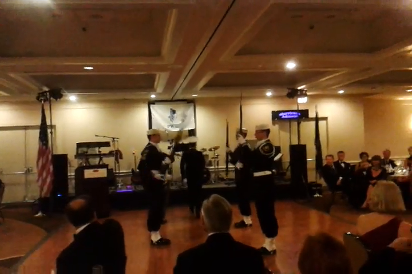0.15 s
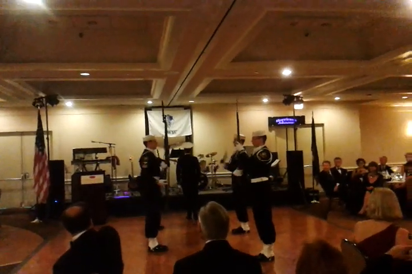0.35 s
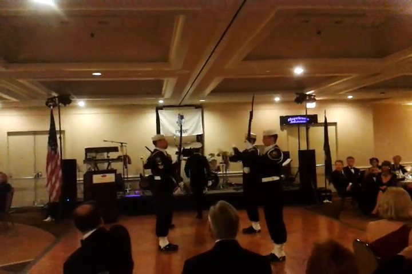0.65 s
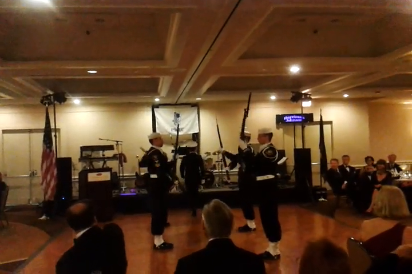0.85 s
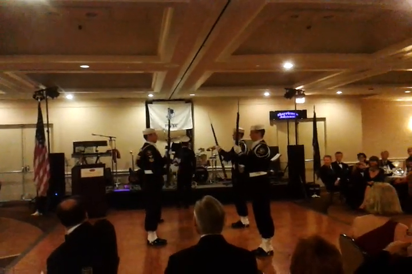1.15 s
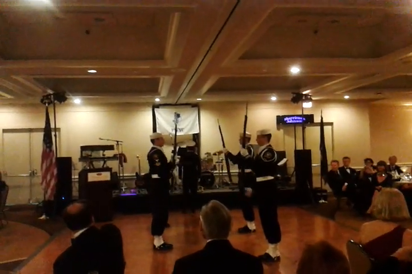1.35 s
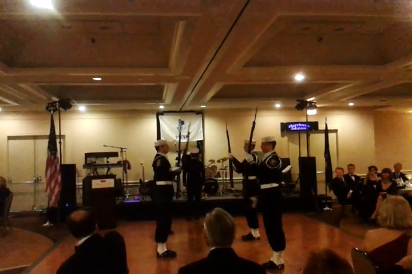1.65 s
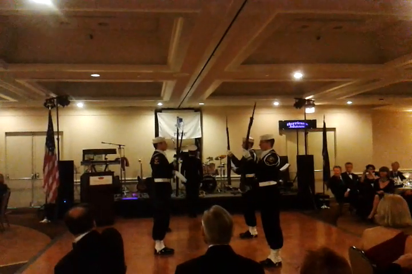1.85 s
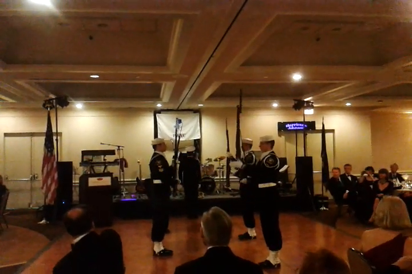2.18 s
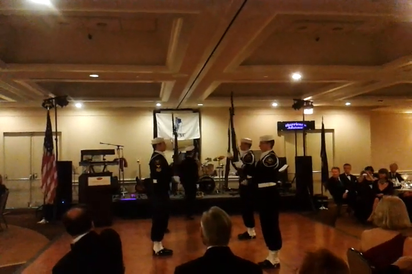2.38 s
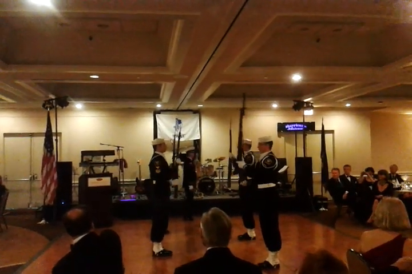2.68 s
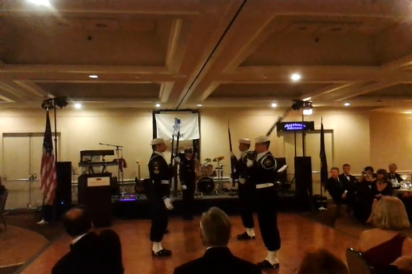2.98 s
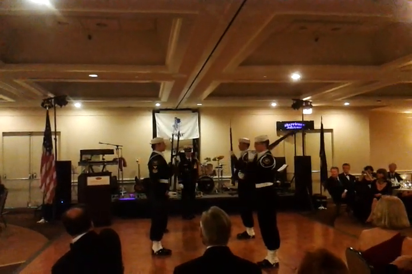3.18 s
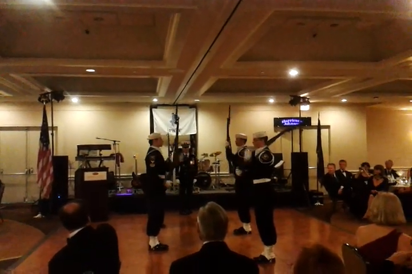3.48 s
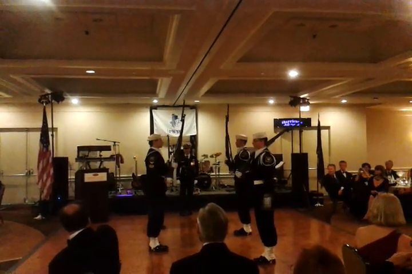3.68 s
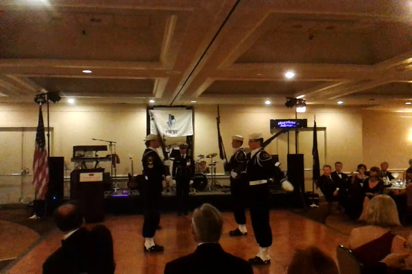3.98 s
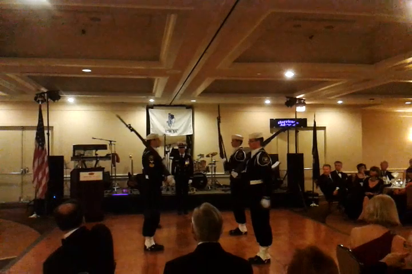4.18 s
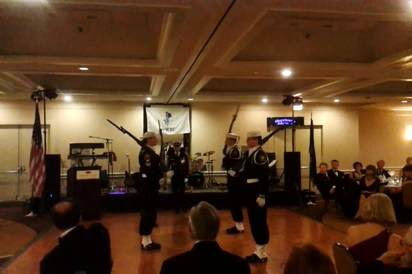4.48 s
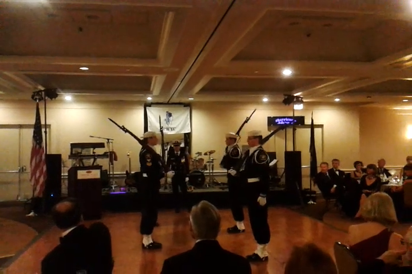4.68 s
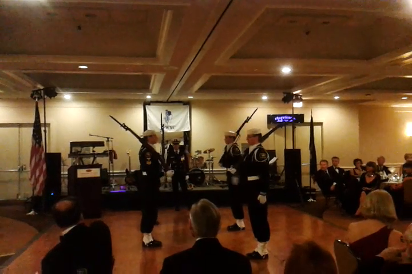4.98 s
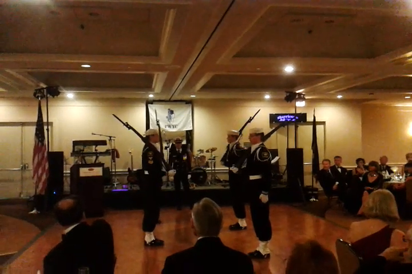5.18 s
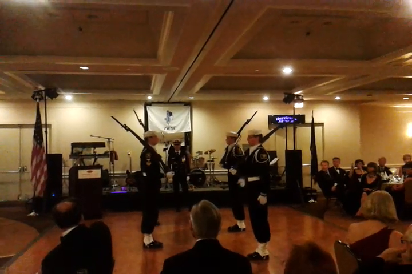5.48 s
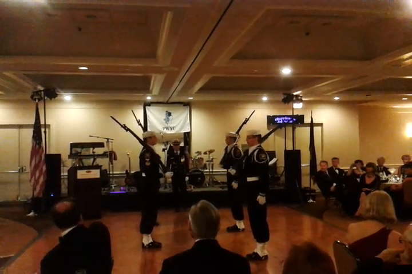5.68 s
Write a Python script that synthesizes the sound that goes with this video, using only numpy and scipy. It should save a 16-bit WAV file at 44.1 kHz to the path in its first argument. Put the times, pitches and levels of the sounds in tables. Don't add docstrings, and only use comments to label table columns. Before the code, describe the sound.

In a carpeted banquet hall, a boot stamps hard on a wooden dance floor with a heel crack and low boom. Loud rifle clacks follow, wood and loose steel together, then lighter catches, ticks and thuds thin out. A small distant camera hears short room echo and quiet ventilation hush.

```python
import sys
import numpy as np
from scipy import signal
from scipy.fft import rfft, irfft, next_fast_len
from scipy.io import wavfile
from scipy.ndimage import uniform_filter1d

SR = 44100
rng = np.random.default_rng(int(sys.argv[2]) if len(sys.argv) > 2 else 0)


def bounce(signal):
    frames = np.transpose(np.atleast_2d(signal))
    limited = np.clip(frames, -1, 1)
    pcm = np.round(limited * 32767).astype(np.int16)
    wavfile.write(sys.argv[1], SR, pcm)


def undo_db(level):
    steps = np.asarray(level, float) / 20
    return 10 ** steps


N = 257979


def evened(x):
    return x / np.sqrt(np.mean(x ** 2) + 1e-20)


def read(points, hz):
    f, value = np.transpose(points)
    return np.interp(np.log(hz + 1), np.log(f + 1), value)


def add(mix, s, sound):
    part = mix[round(s * SR):][:len(sound)]
    part += sound[:len(part)]


def blow(hz, looseness, tilt_db, body, ring_db, ring_width, luck, scatter_db):
    u = np.arange(2000) / SR / (0.015 * np.clip(looseness, .03, 1))
    envelope = u * np.exp(-u * (1 + u / 4))
    impacts = luck[:2000] * undo_db(scatter_db * luck[2000:]) * envelope
    f = abs(np.fft.fftfreq(4096, 1 / SR))
    octaves = np.log2((f + 20) / hz)
    mode_db = ring_db / (1 + (octaves / ring_width) ** 2)
    colour_db = read(body, f) + tilt_db * np.clip(octaves, -2, 2) + mode_db
    log_gain = np.log(undo_db(colour_db))
    phase = -signal.hilbert(log_gain).imag
    ring = np.fft.ifft(np.exp(log_gain + 1j * phase)).real[:3000]
    sound = signal.fftconvolve(impacts, ring)
    sound /= abs(sound).max()
    energy = (sound ** 2).sum()
    return sound, evened(ring) * np.sqrt(energy / len(ring))


# t/ms, level/dB
NEAR_ECHOES = [(3, -6.5), (8, -3.5), (14, -5.5), (26, -7), (37, -15.5), (51, -28)]
FIRM_DB = -30


def struck(events, body, places, looseness, tilt_db, harder_db, ring_db, ring_width, scatter_db, hall_db):
    out = np.zeros((1 + places, N))
    luck = rng.standard_normal((len(events), 4000))
    for k, (s, db, hz, wet_db) in enumerate(events):
        bright_db = tilt_db + harder_db * (db - FIRM_DB)
        sound, all_round = blow(hz, looseness, bright_db, body, ring_db, ring_width, luck[k], scatter_db)
        add(out[0], s - .001, undo_db(db) * sound)
        for j, (ms, echo_db) in enumerate(NEAR_ECHOES):
            delay_s = ms / 1000 * (1 + .06 * luck[k, j])
            add(out[0], s + delay_s, undo_db(db + wet_db + echo_db - 6.5) * sound)
        add(out[1 + k % places], s, undo_db(db + wet_db + hall_db) * all_round)
    return out


# f/Hz, level/dB per Hz
STOCK_COLOUR = [(300, -41.5), (650, -20.5), (850, -3), (1100, -1), (1600, -5.5), (2100, -8), (2500, -19.5),
                (3500, -16), (9000, -69)]


def on_stock(events, places, looseness, tilt_db, harder_db=0):
    return struck(events, STOCK_COLOUR, places, looseness, tilt_db, harder_db,
                  ring_db=7.5, ring_width=0.16, scatter_db=6.5, hall_db=0.5)


# t/s, blow level/dB, favoured f/Hz, hall level/dB
CATCH_BLOWS = [(0.185, -18, 1597, -1), (0.687, -15.5, 2260, 3), (0.688, -19.5, 1116, 0.5),
               (0.853, -27.5, 840, -1.5), (0.975, -32, 1270, -4.5), (1.078, -28.5, 1050, -3),
               (1.38, -26.5, 1010, 2.5), (1.397, -14, 1340, -3.5), (1.414, -19, 1120, 3.5),
               (1.721, -21.5, 1136, 0.5), (1.97, -21, 1290, -4.5), (2.55, -24, 1120, -4),
               (2.678, -31, 900, -4), (2.699, -27, 1370, -6), (3.27, -36, 920, -4), (3.285, -31.5, 1020, 0),
               (3.321, -30, 1350, -4.5), (3.686, -33.5, 1360, -3.5), (3.844, -26, 1046, 0.5),
               (3.869, -27, 1080, -7.5), (4.419, -27.5, 790, -2), (5.071, -29.5, 1360, 3),
               (5.496, -32, 960, 3.5), (5.518, -43, 940, 8.5), (5.772, -22, 1470, 1)]


def catches(places):
    return on_stock(CATCH_BLOWS, places, looseness=0.31, tilt_db=0.36, harder_db=0.3749)


# t/s, blow level/dB, favoured f/Hz, hall level/dB
GRIP_BLOWS = [(0.094, -43, 1470, 0), (0.41, -51, 1550, -2), (0.882, -36.5, 1130, 1), (1.003, -38, 1410, -5),
              (1.258, -38.5, 1200, -5), (1.355, -48, 1480, 10), (2.247, -38.5, 1740, -4),
              (2.304, -49, 1490, -13), (2.543, -36, 1140, -8), (2.765, -38.5, 1280, -0.5),
              (2.905, -44, 1280, -11), (3.072, -44.5, 1720, 6), (3.189, -43, 1120, -2),
              (3.344, -36, 1230, -5), (3.596, -52.5, 1300, 8), (3.66, -42, 1710, -12),
              (3.778, -37.5, 1150, -6), (4.369, -39.5, 1610, -2.5), (5.031, -37.5, 1140, -0.5),
              (5.559, -41, 855, 7)]


def grips(places):
    return on_stock(GRIP_BLOWS, places, looseness=0.26, tilt_db=1.5)


# f/Hz, level/dB per Hz
STEEL_COLOUR = [(800, -54), (1800, -15.5), (2600, -5.5), (3600, -2), (4400, 1), (5000, -1.5), (6000, 0.5),
                (7500, -5.5), (9000, -9.5)]


def on_steel(events, places, looseness, tilt_db, harder_db=0):
    return struck(events, STEEL_COLOUR, places, looseness, tilt_db, harder_db,
                  ring_db=7, ring_width=0.1, scatter_db=7.0, hall_db=-1.0)


# t/s, blow
# level/dB, favoured f/Hz, hall level/dB
CLACK_BLOWS = [(1.7208, -21, 6450, -5.5), (0.6881, 0, 3830, -5.5), (0.6967, -8.5, 5330, -4.5),
               (0.714, -7.5, 5500, -4.5), (0.862, -26.5, 6340, 3), (1.274, -29.5, 3670, -4),
               (1.3811, -19.5, 6560, 7.5), (1.3964, -2.5, 5130, 0), (1.403, -13.5, 5720, 1),
               (1.7200, -17.5, 6570, -2.5), (1.7262, -25.5, 4530, 1.5), (1.9706, -19.5, 2930, -4.5),
               (1.9735, -16.5, 3000, -6.5), (2.55, -26, 5640, -1), (2.6873, -28, 4250, 0),
               (2.7632, -31, 3740, 1.5), (3.0725, -21.5, 6400, -3.5), (3.2505, -33, 6850, 2),
               (3.2801, -27.5, 3420, 3), (3.3192, -21, 3200, -1.5), (3.8411, -25, 5700, 8.5),
               (3.8649, -23.5, 5710, -10), (4.368, -32, 6200, 0), (5.0699, -26.5, 5750, 1.5),
               (5.261, -40, 6800, -15), (5.7748, -23, 3420, -6.5)]


def clacks(places):
    return on_steel(CLACK_BLOWS, places, looseness=0.23, tilt_db=-1.0, harder_db=0.0641)


# t/s, blow level/dB, favoured f/Hz
TICK_BLOWS = [(0.1758, -41, 6030), (0.4674, -52, 3030), (0.973, -39, 4160), (1.066, -38, 5900),
              (1.173, -38.5, 3620), (2.2457, -38, 3950), (2.438, -47.5, 3600), (2.5438, -37, 3520),
              (2.5753, -40, 5740), (2.639, -43.5, 3380), (2.6786, -36, 2960), (2.9045, -50, 3490),
              (3.0632, -37, 4100), (3.098, -34.5, 4130), (3.19, -39.5, 3330), (3.596, -44, 5700),
              (3.6125, -42.5, 5770), (3.697, -39, 5970), (3.979, -53, 5700), (4.28, -49, 6700),
              (4.424, -34.5, 3160), (4.874, -57, 3050), (.185, -15.5, 4150), (5.029, -35, 5500),
              (5.4953, -45, 3020), (5.5139, -38, 3960), (5.5986, -50, 3080)]


def ticks(places):
    hall_level_db = 2.5
    events = [(*row, hall_level_db) for row in TICK_BLOWS]
    return on_steel(events, places, looseness=0.27, tilt_db=-3.0)


# f/Hz, level/dB per Hz
BOARD_COLOUR = [(40, -26), (90, -9), (130, -2), (260, -3), (400, -4.5), (600, -8.5), (800, -13.5),
                (1200, -23), (9000, -65.5)]


def on_boards(events, places, looseness, tilt_db, harder_db=0):
    return struck(events, BOARD_COLOUR, places, looseness, tilt_db, harder_db,
                  ring_db=10.5, ring_width=0.34, scatter_db=1.5, hall_db=-1.5)


# t/s, blow level/dB, favoured f/Hz, hall level/dB
STAMP_BLOWS = [
    (0.176, -40, 400, -13),
    (.187, -13.5, 253, 0.5),
]


def stamp(places):
    return on_boards(STAMP_BLOWS, places, looseness=0.41, tilt_db=0.0)


# f/Hz, level/dB, t60/s
PANEL_MODES = [(128.8, -14, 0.2), (148.7, -15, 0.18), (184.3, -19.5, 0.21), (228.7, -26, 0.53),
               (259.3, -25, 0.5), (381, -21.5, 0.2), (470, -45, 0.13)]


def panel():
    t, out = np.arange(SR) / SR, np.zeros(N)
    boom = np.zeros(SR)
    for hz, db, t60 in PANEL_MODES:
        boom += undo_db(db - 60 * t / t60) * np.sin(2 * np.pi * hz * t)
    swell = 1 - np.exp(-t / 0.017)
    add(out, STAMP_BLOWS[-1][0], boom * swell)
    return out


# t/s, blow level/dB, favoured f/Hz, hall level/dB
HEEL_BLOW = [
    (0.1855, -12.5, 1545, -4.5),
]
# f/Hz, level/dB per Hz
PLATE_COLOUR = [(500, -49), (1100, -23), (1450, 8.5), (1800, 0), (2200, -11), (3000, -34), (9000, -60)]


def heel(places):
    return struck(HEEL_BLOW, PLATE_COLOUR, places, looseness=0.11, tilt_db=3.1, harder_db=0,
                  ring_db=6.5, ring_width=0.17, scatter_db=-2, hall_db=0.8)


# t/s, blow level/dB, favoured f/Hz, hall level/dB
THUD_BLOWS = [(0.686, -32.5, 430, 1), (0.941, -42.5, 159, 5.5), (1.474, -35, 162, -1.5),
              (1.491, -33.5, 620, 3), (1.721, -42, 570, 4), (1.967, -38.5, 750, 6.5), (2.248, -49, 274, -6),
              (3.079, -50.5, 560, 3.5), (3.309, -46.5, 680, 7.5), (3.57, -50, 347, -5),
              (4.277, -49, 397, 4.5), (4.415, -43.5, 495, 13.5), (5.412, -47.5, 484, 3),
              (5.502, -36.5, 406, 7.5), (5.772, -29, 390, 1.5), (.186, -20.5, 412, -0.5)]


def thuds(places):
    return on_boards(THUD_BLOWS, places, looseness=0.39, tilt_db=3.0, harder_db=0.14)


# t/s, blow level/dB, favoured f/Hz, hall level/dB
PALM_BLOWS = [(0.974, -35, 600, -3), (1.381, -32, 606, 0), (1.398, -30, 700, 4), (2.7, -46, 500, 6.5),
              (3.845, -40, 750, 7), (5.032, -46, 580, 2), (5.072, -48.5, 500, 7.5),
              (5.4905, -34.5, 700, -3), (5.497, -35, 680, 7)]


def palms(places):
    return on_boards(PALM_BLOWS, places, looseness=0.53, tilt_db=10.5)


def scuff():
    start_s, level_db, band_hz, t60_s = 4.852, -56, (1600, 4100), 0.37
    t, out = np.arange(SR // 4) / SR, np.zeros(N)
    grains = rng.standard_normal(len(t)) * undo_db(4 * rng.standard_normal(len(t)))
    band = signal.butter(2, band_hz, "band", fs=SR, output="sos")
    brush = evened(signal.sosfilt(band, grains))
    add(out, start_s, brush * np.minimum(t / .006, 1) * undo_db(level_db - 60 * t / t60_s))
    return out


# from t/s, to t/s, f/Hz, level/dB
STEEL_RINGS = [(5.712, 5.76, 2640, -58), (5.715, 5.775, 3370, -61), (5.75, 5.775, 2170, -56),
               (4.55, 4.8, 6150, -69), (3.86, 4, 5750, -60)]


def chain():
    out = np.zeros(N)
    for start, end, hz, db in STEEL_RINGS:
        count = round((end - start) * SR)
        slow_noise = uniform_filter1d(rng.standard_normal((2, SR)), 400, axis=1)
        waver, drift = evened(slow_noise)[:, :count]
        turns = np.cumsum(hz * (1 + 0.013 * drift)) / SR
        tone = np.sin(2 * np.pi * turns) * signal.windows.hann(count)
        add(out, start, undo_db(db + 4.4 * waver) * tone)
    return out


# f/Hz, t60/s
HALL_DECAY = [(120, 0.84), (330, 0.7), (870, 0.5), (2300, 0.61), (6000, 0.41), (9000, 0.27)]


def hall_tails(count):
    taps = np.zeros((count, SR))
    slots = np.arange(0, SR - 20, 12)
    at = slots + rng.integers(0, 12, (count, len(slots)))
    np.put_along_axis(taps, at, rng.choice([-1., 1.], at.shape), 1)
    hz, t, z = signal.stft(taps, SR, nperseg=256)
    decay_db = -60 * t / read(HALL_DECAY, hz)[:, None]
    tails = signal.istft(z * undo_db(decay_db), SR, nperseg=256)[1][:, :SR]
    t = np.arange(SR) / SR
    tails *= 1 - np.exp(-t / 0.0076)
    tails *= 1 + 0.57 * np.exp(-t / 0.032)
    clumps = evened(uniform_filter1d(rng.standard_normal(tails.shape), 250, axis=1))
    tails *= undo_db(1.48 * clumps)
    return tails / np.linalg.norm(tails, axis=1)[:, None]


# f/Hz, level/dB per Hz
HUSH_COLOUR = [(15, -67), (25, -26), (54, -10), (254, -6), (316, -9.5), (347, -6.5), (522, -7),
               (948, -11.5), (1200, -10), (2780, -17), (4600, -18.5), (6280, -20.5), (7600, -24.5),
               (9880, -62.5), (16700, -120)]
# t/s, level/dB
SHUFFLE_LIFT = [(0, 12.5), (.17, 6), (1.2, 7.5), (2.4, 6.5), (3.45, 4.5), (3.7, 8.5), (4.1, 5), (5.4, 4.5),
                (5.85, 8)]


def hush():
    base_db = -62.5
    frames, hz = N // 256 + 5, np.fft.rfftfreq(1024, 1 / SR)
    a, b, patches = rng.standard_normal((frames, 513, 3)).T
    patches = evened(uniform_filter1d(uniform_filter1d(patches, 12, 0), 12, 1))
    z = (a + 1j * b) * undo_db(read(HUSH_COLOUR, hz)[:, None] + 1.4 * patches)
    air = evened(signal.istft(z, nperseg=1024, noverlap=768)[1])[:N]
    frame_at = np.arange(frames) * 256
    lift_db = np.interp(frame_at / SR, *np.transpose(SHUFFLE_LIFT))
    return undo_db(base_db + np.interp(np.arange(N), frame_at, lift_db)) * air


def scene():
    tails = hall_tails(count=5)
    places = len(tails)
    rifles = catches(places) + grips(places) + clacks(places) + ticks(places) + palms(places)
    floor = stamp(places) + heel(places) + thuds(places)
    blows = rifles + floor
    boom = panel()
    blows[0] += undo_db(-1.5) * boom
    blows[1] += undo_db(-8) * boom
    hall = signal.fftconvolve(blows[1:], tails, axes=1)[:, :N].sum(0)
    return (blows[0] + hall + chain() + hush() + scuff())[None]


def roll_off(x):
    return signal.sosfilt(signal.butter(12, 8920, fs=SR, output="sos"), x)


def record(dry):
    first_rate_hz = 16000
    size = next_fast_len(N)
    hz = np.fft.rfftfreq(size, 1 / SR)
    kept_db = read([(7000, -1.5), (7500, -8.5), (7850, -16.5), (8000, -33.0), (8300, -85)], hz)
    kept = irfft(rfft(dry, size) * undo_db(kept_db), size)
    mirrored = kept * 2 * np.cos(2 * np.pi * first_rate_hz * np.arange(size) / SR)
    leak_db = read([(8000, -11), (8300, -7.5), (8600, -17.5), (9100, -43.5), (9300, -110)], hz)
    raised = kept + irfft(rfft(mirrored) * undo_db(leak_db), size)
    return roll_off(raised[:, :N])


dry = scene()
out = record(dry)
bounce(out)
```